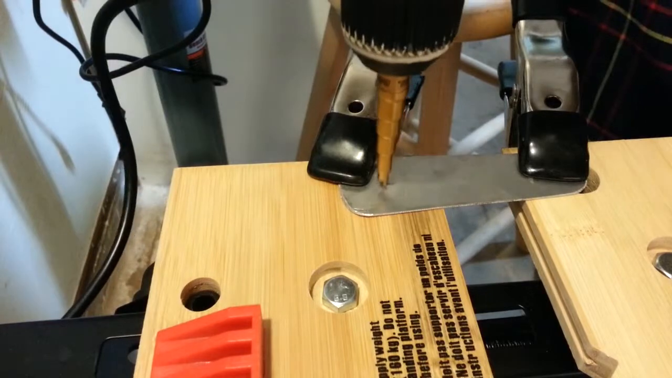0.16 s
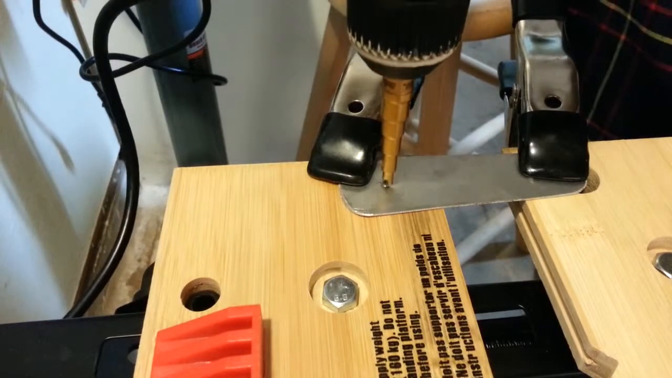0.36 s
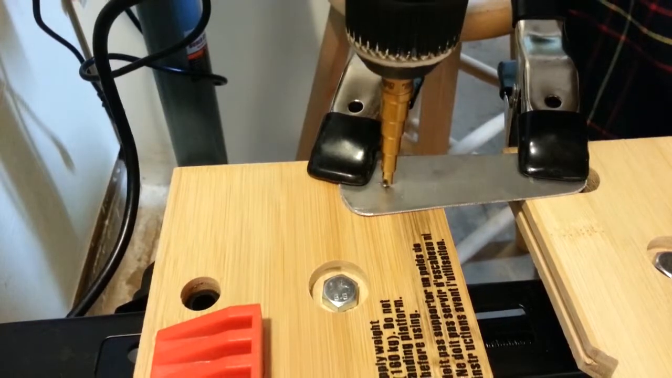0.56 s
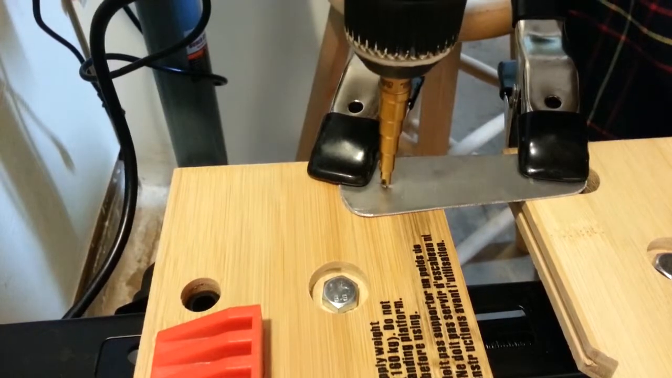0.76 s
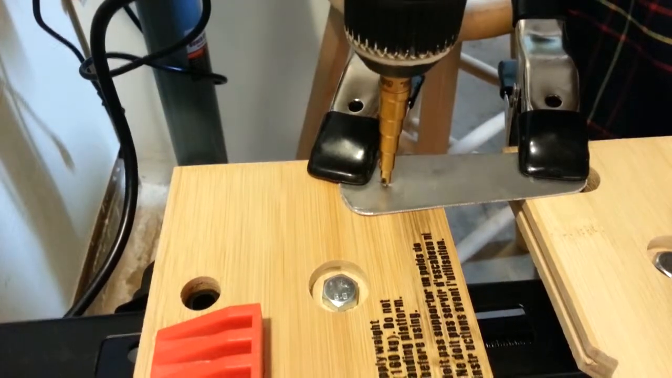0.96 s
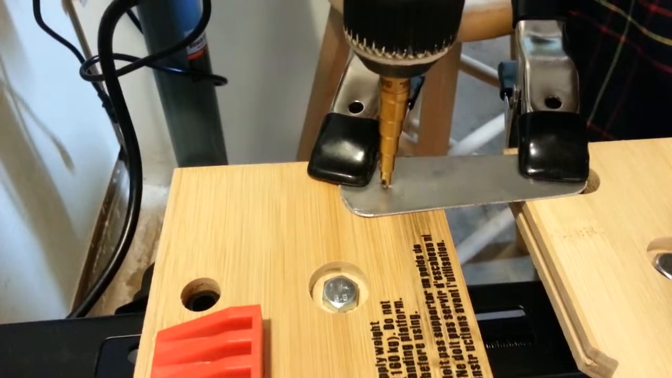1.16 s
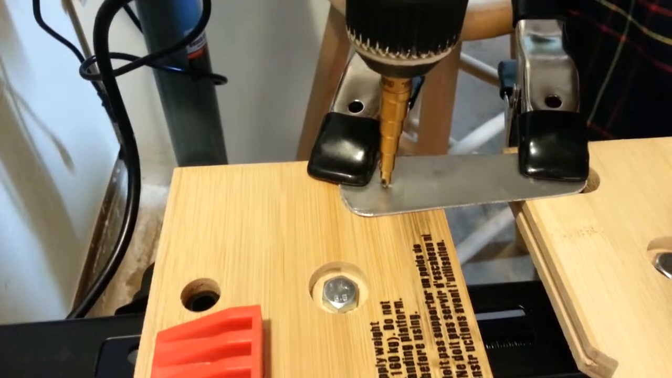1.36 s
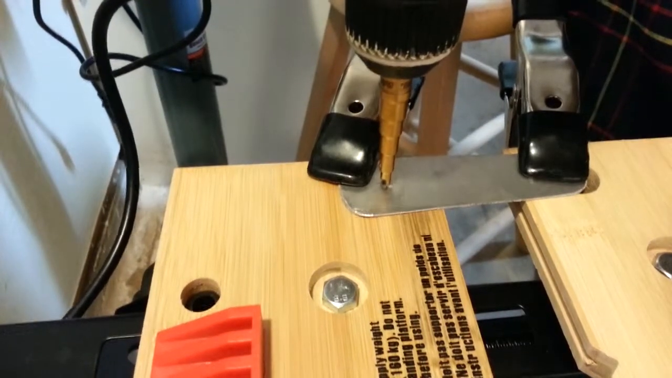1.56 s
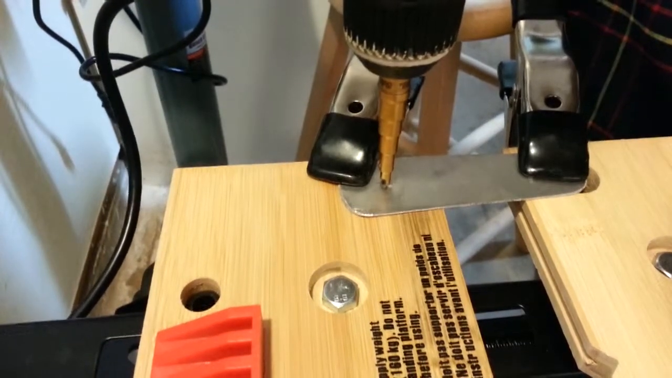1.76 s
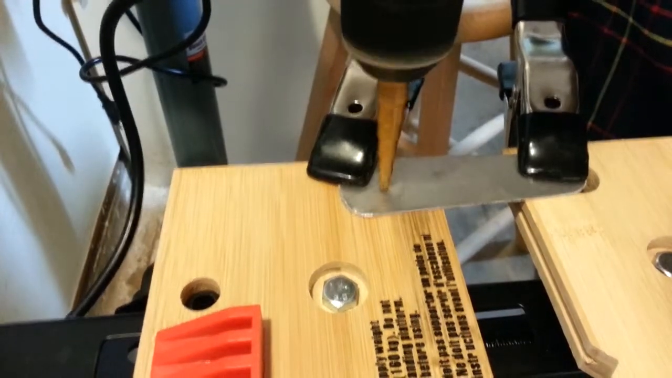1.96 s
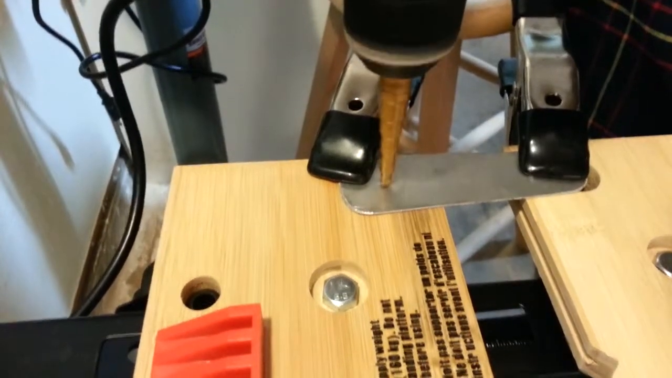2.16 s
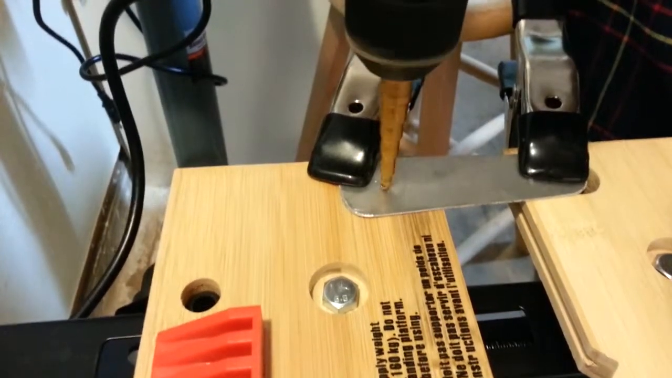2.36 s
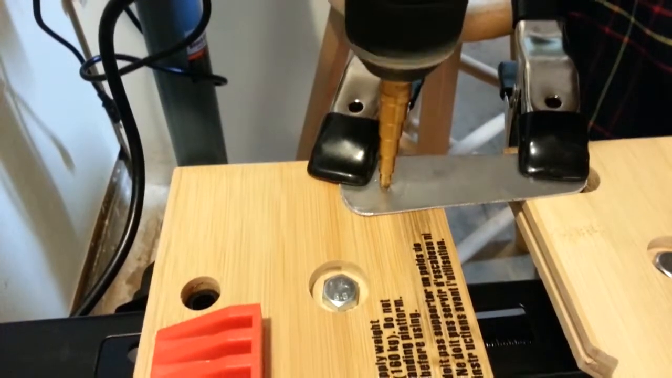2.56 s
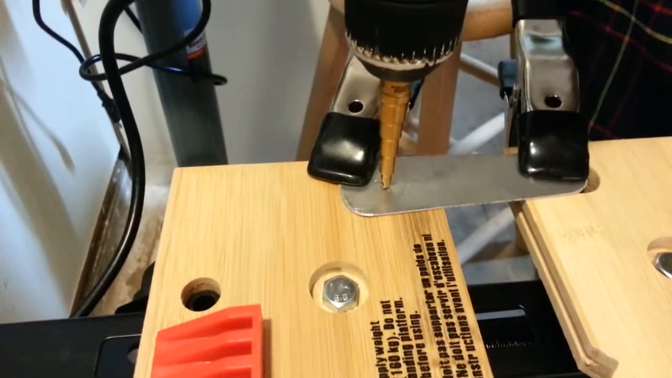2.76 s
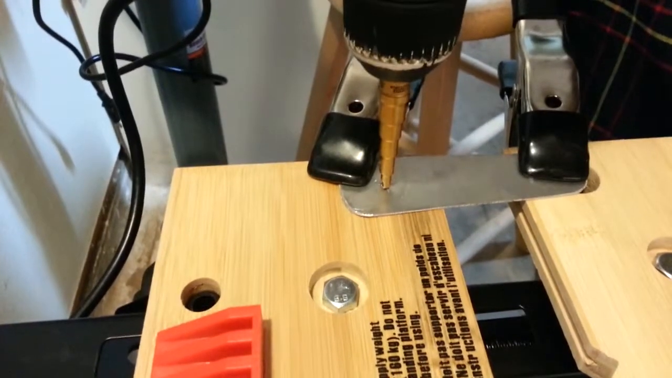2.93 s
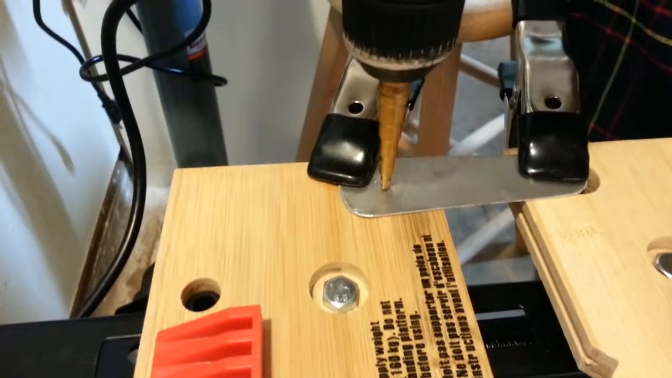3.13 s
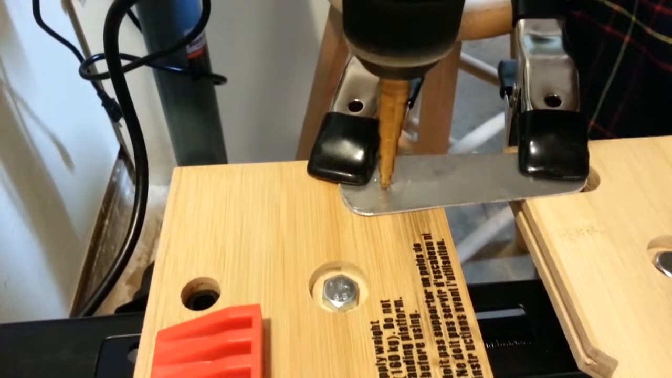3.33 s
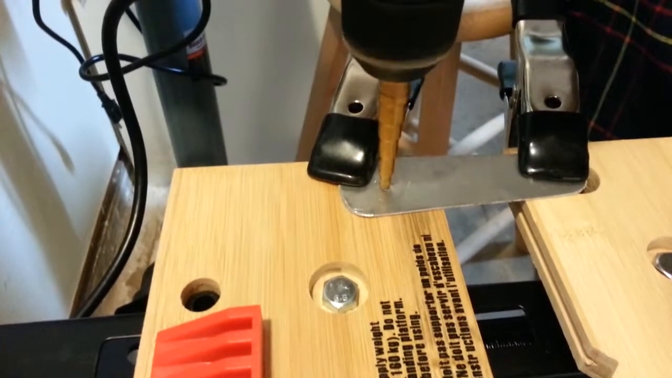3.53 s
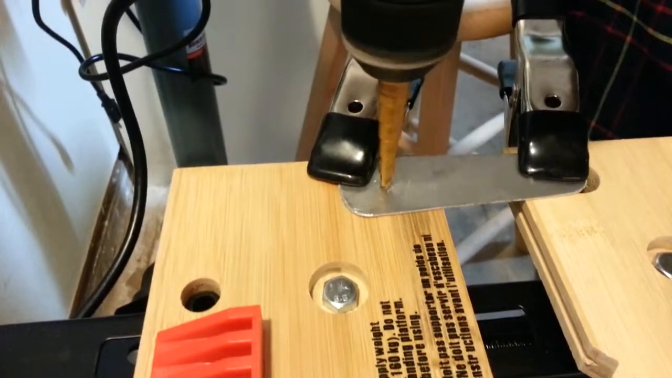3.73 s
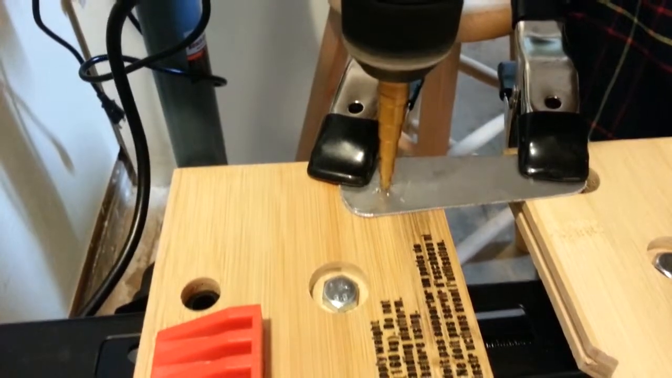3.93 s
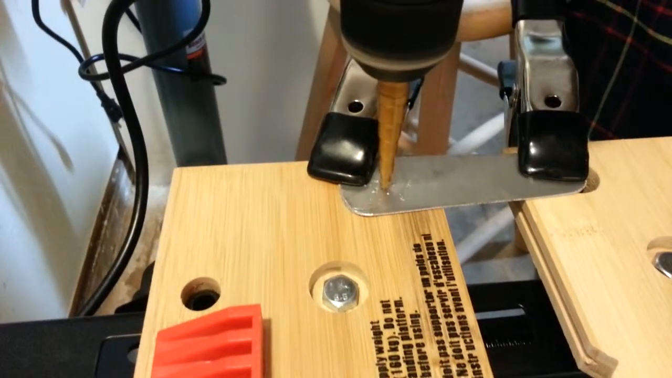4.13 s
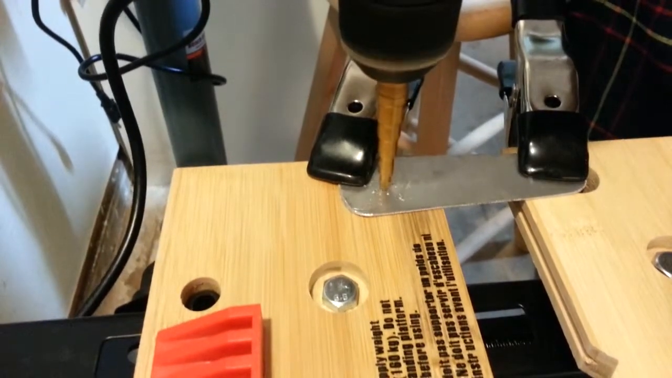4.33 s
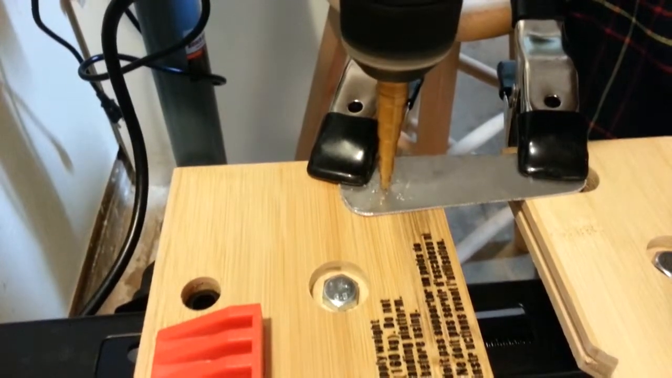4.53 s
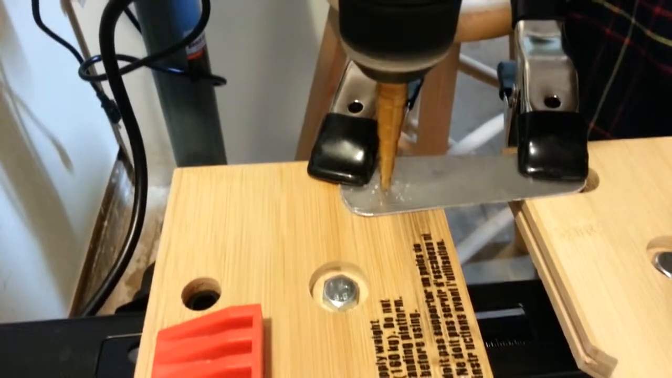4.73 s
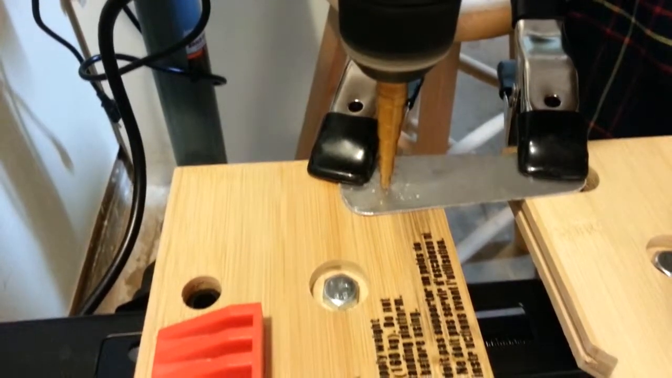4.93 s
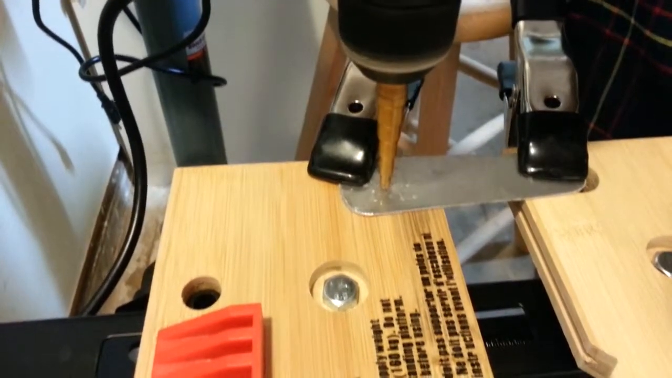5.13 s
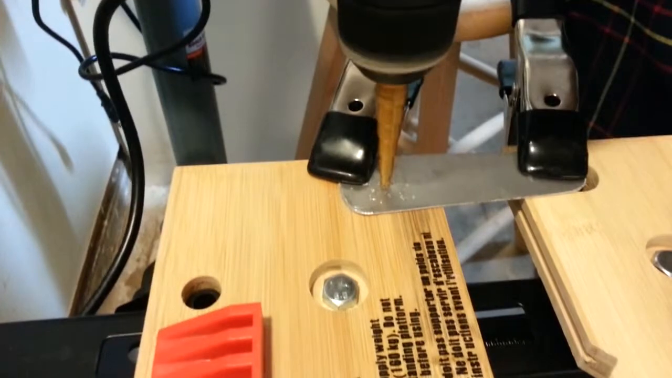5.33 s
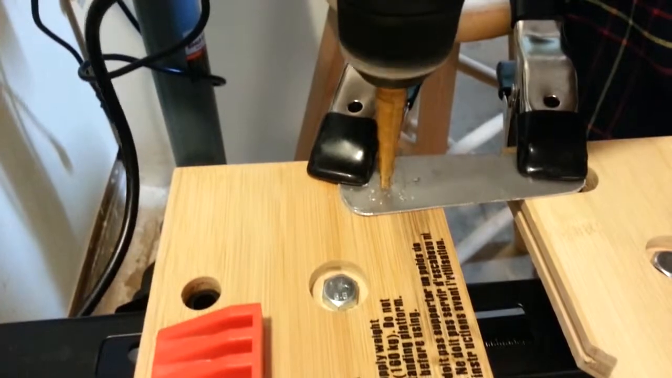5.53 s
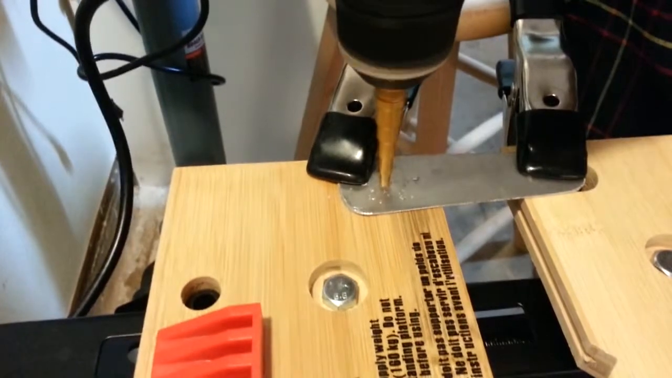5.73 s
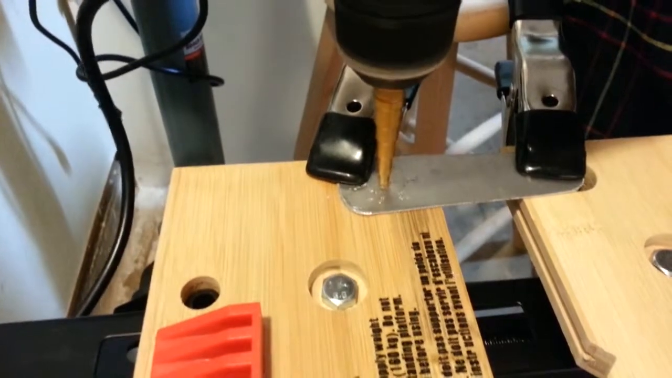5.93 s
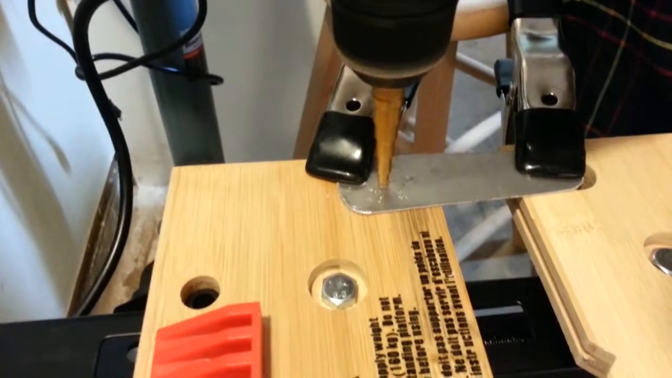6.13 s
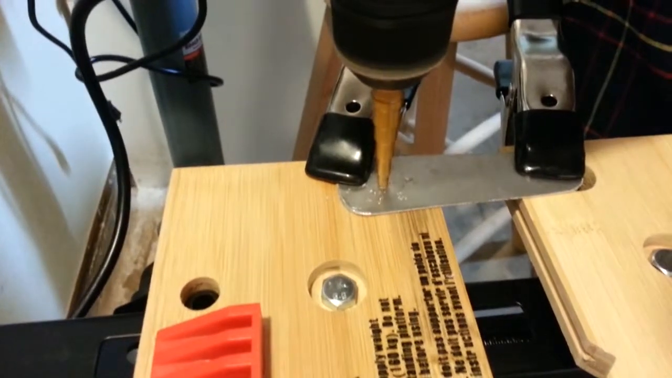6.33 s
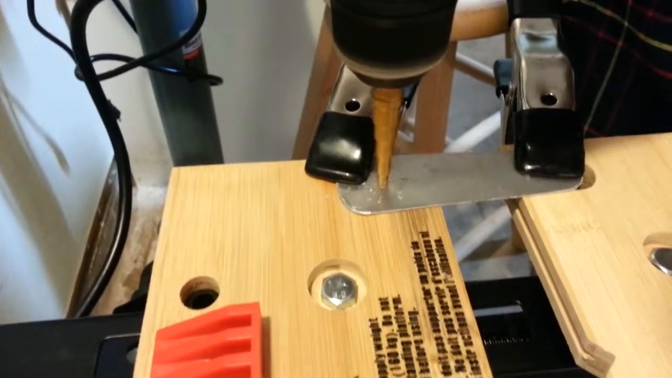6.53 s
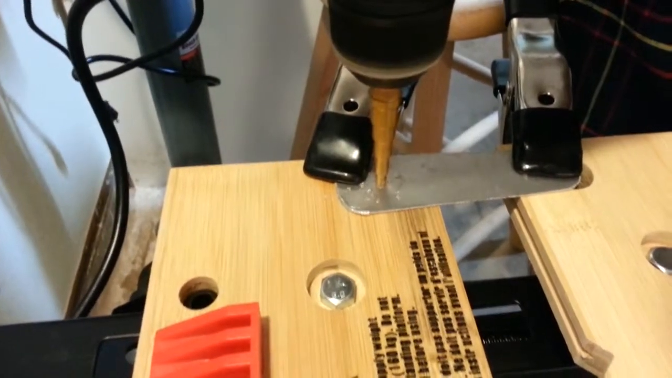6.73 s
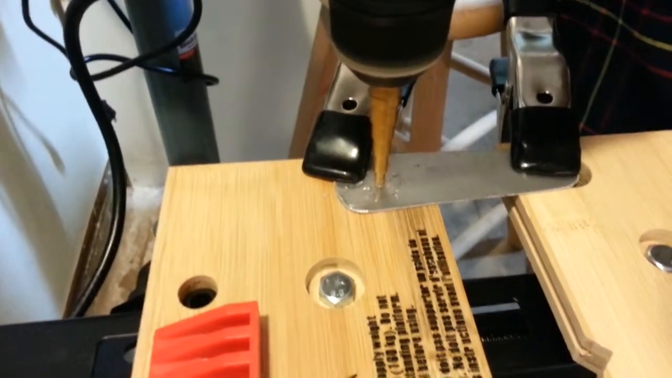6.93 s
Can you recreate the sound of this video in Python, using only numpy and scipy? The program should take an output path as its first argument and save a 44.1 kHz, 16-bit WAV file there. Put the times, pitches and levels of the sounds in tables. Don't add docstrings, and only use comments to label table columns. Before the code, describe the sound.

Close to a small stereo camera, a nearly silent bench is disturbed by light scraping, cloth and trigger clicks. Then an electric drill is pulsed in very brief pulls: each surges to a piercing, buzzing whine and sags into a rattling, falling spin. Early pulls stand apart; later ones overlap the previous run-down and reach higher. Fan air thumps the right microphone, with a short room reflection.

```python
import sys
import numpy as np
from scipy import signal
from scipy.fft import rfft, irfft, next_fast_len
from scipy.io import wavfile
from scipy.ndimage import uniform_filter1d, map_coordinates

SR = 44100
rng = np.random.default_rng(int(sys.argv[2]) if len(sys.argv) > 2 else 0)


def magnitude_from_level(level_db):
    exponent = np.asarray(level_db, float) / 20
    return 10 ** exponent


def to_wav(sig):
    pcm = np.clip(np.atleast_2d(sig), -1, 1) * 32767
    pcm = np.round(pcm).astype(np.int16)
    wavfile.write(sys.argv[1], SR, pcm.T)


N = 312669

BARS = 12
KICK_HZ = 651.3
KNEE_HZ, CLIMB_S = 2602, .2
FRICTION_HZ, COAST_S = 5040, 1.9
# (on [s], off [s], bar rate reached [Hz], surge [Hz/s], bite of the bit [dB])
TRIGGER_PULLS = [
    (1.955, 2.054, 2612, 20940, -0.03),
    (3.225, 3.309, 2672, 24280, 0),
    (3.838, 3.963, 3510, 30950, -0.5),
    (4.408, 4.549, 3498, 19000, -0.5),
    (4.919, 5.081, 3784, 22100, -0.5),
    (5.832, 5.965, 3650, 28700, 0.5),
    (6.36, 6.671, 4330, 21970, -2),
    (6.906, 7.088, 4270, 22000, -2.5),
]


def speed():
    bar_hz, on, bite_db = np.zeros((3, N))
    t = np.arange(N) / SR
    for start, stop, top_hz, surge, db in TRIGGER_PULLS:
        a = round(start * SR)
        b = min(round(stop * SR), N - 1)
        low_hz = bar_hz[a] or KICK_HZ
        knee_hz = max(low_hz, KNEE_HZ)
        knee = min(start + (knee_hz - low_hz) / surge, stop - 1e-3)
        progress = np.expm1((knee - t[a:b]) / CLIMB_S) / np.expm1((knee - stop) / CLIMB_S)
        climb = knee_hz + (top_hz - knee_hz) * progress
        bar_hz[a:b] = np.where(t[a:b] < knee, low_hz + surge * (t[a:b] - start), climb)
        coast = (top_hz + FRICTION_HZ) * np.exp((stop - t[b:]) / COAST_S) - FRICTION_HZ
        bar_hz[b:] = np.maximum(coast, 0)
        on[a:b] = 1
        bite_db[a:] = db
    return bar_hz, uniform_filter1d(on, size=200), bite_db


MAINS_HZ = 119.912
JITTER = .0006


def motor():
    bar_hz, powered, _ = speed()
    shaft_hz = bar_hz / BARS * (1 + JITTER * wobble(60))
    throb = powered * np.cos(2 * np.pi * MAINS_HZ * np.arange(N) / SR)
    turn = 2 * np.pi * np.cumsum(shaft_hz) / SR
    return shaft_hz, turn, powered, throb


RUNDOWN_S = 0.019
ATTACK_S = 0.0081
RATTLE_DB, RATTLE_DB_PER_DECADE, POWER_DB, STALL_HZ = -37, 22, 2, 313
HISS_DB, HISS_DB_PER_DECADE, HISS_POWER_DB, HISS_STALL_HZ = -2.5, -11.5, 0, 770
FAN_DB, FAN_DB_PER_DECADE, FAN_FULL_HZ, FAN_LAG_S = -33.5, 61.5, 2510, 0.03
WHINE_DB, WHINE_DB_PER_DECADE = 1.5, 5


def running():
    bar_hz, on, bite_db = speed()
    bar_hz = np.maximum(bar_hz, trailing(bar_hz, RUNDOWN_S))

    def decades(hz, ref_hz):
        return np.log10(hz / ref_hz + 1e-3)

    def stall_db(hz):
        return 20 * np.minimum(decades(bar_hz, hz), 0)

    opening_db = 40 * np.log10(trailing(1. * (bar_hz > 0), ATTACK_S / 2) + 1e-3)
    push_db = trailing(POWER_DB * on + bite_db, 0.004)
    rattle_db = RATTLE_DB + RATTLE_DB_PER_DECADE * decades(bar_hz, 2793)
    rattle_db = rattle_db + push_db + stall_db(STALL_HZ) + opening_db
    pace = decades(bar_hz + 300, 2000)
    hiss_db = HISS_DB + HISS_DB_PER_DECADE * pace + HISS_POWER_DB * on + stall_db(HISS_STALL_HZ).clip(-9)
    fan_pace = np.minimum(decades(trailing(bar_hz, FAN_LAG_S), FAN_FULL_HZ), 0)
    fan_db = FAN_DB + FAN_DB_PER_DECADE * fan_pace
    whine_db = WHINE_DB + WHINE_DB_PER_DECADE * pace
    return rattle_db, hiss_db, fan_db, whine_db


OVERTONES_FLUTTER_DB = 2.2
STRONG_ORDERS = [11, 14, 17, 22, 23, 25, 28, 31, 32, 34, 35, 36, 37, 38, 46, 47, 48, 53, 57, 59, 60, 61, 70,
                 71, 72]
STRONG_ORDER_LEVELS = [-11.5, -12, -14, -3.5, 0.5, -7, -5, -10, -10, -8, -5, -3.5, -7, -9, 1.5, -4, -2.5, 1,
                       -9, 3, 0, -5, -1, 2, 4]


def comb(turn, orders):
    strong = dict(zip(STRONG_ORDERS, STRONG_ORDER_LEVELS))
    gains = magnitude_from_level([strong.get(order, -15) for order in orders])
    angle = np.linspace(0, 2 * np.pi, num=8193)
    start, other = rng.uniform(-np.pi, np.pi, (2, len(orders)))
    phases = [start, start + other * np.clip(orders / 45, 0, 1) ** 2]
    shapes = [gains @ np.sin(orders[:, None] * angle + phase[:, None]) for phase in phases]
    lines = np.array([np.interp(turn % (2 * np.pi), angle, shape) for shape in shapes])
    flutter_db = np.clip(orders[0] / 30, .5, 1) * OVERTONES_FLUTTER_DB * wobble(30)
    return magnitude_from_level(flutter_db) * lines


BAR_DB, UPPER_DB, FLUTTER_DB = -5.5, -12, 1.2
# (frequency [Hz], level [dB])
HOUSING = [(700, -42), (1700, -33), (2350, -9), (2750, -5.5), (3050, 0.5), (3400, -2.5), (4000, 0.5),
           (4900, -0.5), (5550, -3.5), (6000, -21.5), (7000, -9.5), (10000, -12.5), (14000, -27)]


def whine(shaft_hz, turn, powered, throb):
    rattle_db, _, _, whine_db = running()
    orders = np.setdiff1d(np.arange(5, 86), [BARS, BARS + 1, 2 * BARS])
    groups = np.array_split(orders, 6)
    lines = sum(comb(turn, group) * np.clip(5 - group[0] * shaft_hz / 3500, 0, 1) for group in groups)
    torque = powered * np.clip(3.9 - shaft_hz / 88, 0, 1)
    octave_torque = powered * np.clip(2.6 - shaft_hz / 80, 0, 1)
    bar = magnitude_from_level(BAR_DB + 17.3 * torque + 0.98 * wobble(40)) * np.sin(BARS * turn)
    octave = magnitude_from_level(0.7 + 13.7 * octave_torque + FLUTTER_DB * wobble(40)) * np.sin(2 * BARS * turn)
    upper = magnitude_from_level(UPPER_DB + shaft_hz / 30 + 0.9 * wobble(37)) * np.sin((BARS + 1) * turn)
    lines = upper + (1 + 0.96 * throb) * (bar + octave) + magnitude_from_level(-4 * powered) * lines
    return filtered(magnitude_from_level(rattle_db + whine_db) * lines, lambda hz: magnitude_from_level(along(HOUSING, hz)))


GRIND_DB, GRIND_FULL_HZ = -55, 21
# (frequency [Hz], level [dB per Hz])
RATTLE = [(290, -18), (500, -3.5), (683, -4), (973, 1.5), (1210, -4), (1760, 2), (2060, -4), (2730, -3.5),
          (3070, -7.5), (3310, -6), (3560, -0.5), (4280, -11), (4710, -3.5), (6030, -28), (6500, -37.5),
          (8450, -50), (14300, -120)]
# (frequency [Hz], level [dB per Hz])
HISS = [(3240, -49.5), (5500, 2.5), (6100, -5.5), (6870, -1.5), (8000, -7), (13400, -13.5), (14700, -19)]
# (frequency [Hz], level [dB per Hz])
GRIND = [(1500, -32), (2500, -6), (3300, 3), (4500, -6), (7000, -27)]
# (frequency [Hz], left-right likeness [-1 to 1])
DRILL_ALIKE = [(500, 0.85), (1400, 0.58), (3000, 0.11), (5000, 0.14), (8000, 0.067), (14000, 0.12)]


def rush(turn, throb):
    rattle_db, hiss_db = running()[:2]
    rattle_beat_db = 0.44 * np.sin(turn) + 0.24 * throb + 0.6 * wobble(70)
    rattle = unit(magnitude_from_level(rattle_beat_db) * pair(RATTLE, DRILL_ALIKE))
    hiss_beat_db = 1.5 * np.sin(turn + 1) + 0.87 * throb + 0.66 * wobble(90)
    hiss = unit(magnitude_from_level(hiss_beat_db) * pair(HISS, DRILL_ALIKE))
    shaft_hz = np.gradient(turn) * SR / (2 * np.pi)
    spinning = trailing(np.clip(shaft_hz / GRIND_FULL_HZ, 0, 1), RUNDOWN_S)
    grind = magnitude_from_level(GRIND_DB) * spinning * pair(GRIND, DRILL_ALIKE)
    return grind + magnitude_from_level(rattle_db + 6.0) * rattle + magnitude_from_level(rattle_db + hiss_db + 3.5) * hiss


PUFF_S = 0.0096
# (frequency [Hz], level [dB per Hz])
DRAUGHT = [(15, -61), (25, -10), (205, 6.5), (405, 2.5), (454, 4), (681, -5), (972, 3), (1200, -41),
           (1560, -46), (2640, -120)]
# (time [s], peak level [dB], frequency [Hz])
PUFFS = [(2.102, -16.5, 440), (2.143, -20, 447), (2.178, -18, 334), (2.282, -20, 335), (2.344, -24, 330),
         (3.367, -23, 334.3), (3.404, -20, 375), (3.505, -21, 214), (3.975, -19.5, 646),
         (4.028, -13.5, 513), (4.072, -20, 517), (4.206, -20, 250), (4.526, -15, 285), (4.598, -17.5, 478),
         (4.646, -20.5, 454), (4.751, -16, 288), (5.001, -20.5, 312), (5.113, -14, 432.5),
         (5.16, -17.5, 222.8), (5.226, -19.5, 346), (5.289, -15.5, 611), (5.479, -18.5, 381.6),
         (5.966, -22, 233.5), (6.014, -18, 458), (6.444, -25.5, 243), (6.537, -19, 627),
         (6.582, -18.5, 363), (6.689, -18.5, 301), (6.94, -18.5, 538), (7.027, -16, 342)]


def draught():
    lumps = magnitude_from_level(4 * np.array([wobble(70), wobble(70)]))
    air = magnitude_from_level(running()[2] + [[-14], [3]]) * unit(lumps * noise(DRAUGHT, channels=2))
    t = np.arange(SR // 10) / SR
    push, swirl = np.zeros((2, N + len(t)))
    for (s, db, hz), phase in zip(PUFFS, rng.random(len(PUFFS))):
        u = t * hz / 0.66
        v = t / PUFF_S
        i = round(s * SR)
        push[i:][:len(t)] += magnitude_from_level(db + 0.5) * u * np.exp(1 - u) * np.sin(2 * np.pi * (hz * t + phase))
        swirl[i:][:len(t)] += magnitude_from_level(db - 5.0) * v * np.exp(1 - v * v)
    thumps = filtered(push[:N], lambda hz: 1j * hz / (90 + 1j * hz))
    swirls = swirl[:N] * noise([(60, -12), (200, 1.5), (500, 1.5), (1000, -7.5), (1600, -51)])
    return air + magnitude_from_level([[-24], [0]]) * (thumps + swirls)


# (time [s], peak level [dB], ring [Hz], treble over peak [dB], left-right [dB])
CLICKS = [(0.344, -62, 958, -25, 2), (0.468, -48, 2100, -12.5, 4), (0.595, -56.5, 1220, -14, 2),
          (1.224, -64, 1020, -9, -1.5), (1.408, -53, 1030, -36, 2.0), (1.651, -62, 2010, -13, 2.0),
          (1.806, -47, 1420, -18, 7), (1.813, -36.5, 2110, -19.5, -3), (3.097, -43.5, 2270, -15.5, 1.5),
          (3.102, -40, 1650, -20, -2), (3.199, -54, 2020, -17, 2), (3.205, -64.5, 925, 2, 0.5),
          (3.222, -49, 3820, -25, 2.5)]


def clicks():
    t = np.arange(SR // 20) / SR
    out = np.zeros((2, N + len(t)))
    for s, db, hz, treble_db, pan_db in CLICKS:
        ring = magnitude_from_level(-60 * t / 0.014) * np.sin(2 * np.pi * hz * t)
        knock = 0.39 * magnitude_from_level(-60 * t / .025) * np.sin(2 * np.pi * 540 * t)
        dulled = np.convolve(rng.standard_normal(len(t)), np.ones(5) / 3, "same")
        scatter = magnitude_from_level(treble_db + 11 - 60 * t / .015) * dulled
        crack = magnitude_from_level(treble_db - 18 - 60 * t / .008) * np.diff(rng.standard_normal(len(t) + 1))
        gain = magnitude_from_level(db + 1.3 + pan_db * np.array([[.5], [-.5]]))
        i = round(s * SR)
        out[:, i:i + len(t)] += gain * (ring + knock + scatter + crack)
    return out[:, :N]


# (frequency [Hz], t60 [s])
WALLS = [(300, 0.19), (2000, 0.17), (8000, 0.073), (14000, 0.043)]


def walls(x):
    hz, t, z = signal.stft(rng.standard_normal((2, SR // 2)), SR, nperseg=256)
    fade = magnitude_from_level(-60 * t / along(WALLS, hz)[:, None])
    tail = signal.istft(z * fade, SR, nperseg=256)[1]
    return signal.fftconvolve(x, tail / np.linalg.norm(tail[0]), axes=1)[:, :N]


AIR_DB = -76
DRONE_DB, DRONE_WAVERS_DB, DRONE_REST_DB = -72.5, 2.5, -85
DRONE_STOPS_S, DRONE_FADES_DB_PER_S = 0.91, 60
# (frequency [Hz], level [dB per Hz])
ROOM_AIR = [(15, -55), (25, -51), (49, -4.5), (206, -3), (241, -1.5), (262, -3.5), (390, -7), (434, -9.5),
            (538, -13.5), (648, -9), (846, -17.5), (941, -18), (14700, -29.5)]
# (frequency [Hz], left-right likeness [-1 to 1])
ROOM_AIR_ALIKE = [(60, 0.76), (130, 0.55), (290, 0.0055), (640, 0.064), (1410, 0.18), (3100, -0.19),
                  (6820, -0.43), (15000, 0.28)]
# (time [s], level [dB])
SCRAPES = [
    (0.0, -67),
    (.16, -67.5),
]
# (time [s], length [s], level [dB], fade over the length [dB])
RUSTLE = [
    (0.0, 0.53, -75, 12),
    (1.003, 0.32, -82, -8),
    (1.657, 0.1, -69, 25),
    (1.813, 0.17, -65, 3),
    (2.802, 0.294, -65, 6.5),
    (3.095, 0.17, -58, 22),
]


def shop():
    t = np.arange(N) / SR
    air = magnitude_from_level(AIR_DB + 8.0 + 0.46 * wobble(3.7)) * pair(ROOM_AIR, ROOM_AIR_ALIKE)

    drone_db = DRONE_DB - DRONE_FADES_DB_PER_S * np.maximum(t - DRONE_STOPS_S, 0)
    drone_db = np.maximum(drone_db, DRONE_REST_DB) + DRONE_WAVERS_DB * wobble(7.6)
    drone = magnitude_from_level(drone_db) * noise([(440, -31), (500, -4.5), (530, -4.5), (580, -13), (640, -48.0)])
    hum = magnitude_from_level(-75.5 + 3.2 * wobble(13)) * np.sin(2 * np.pi * 237 * t)

    stroke_db = np.max([db - 105 * np.abs(t - s) for s, db in SCRAPES], axis=0)
    scrape = magnitude_from_level(stroke_db) * noise([(600, -40), (670, 7.0), (760, -17), (1000, -7), (1300, -35),
                                     (1850, -11.0), (2100, -12.5), (2500, -49)])

    rustle_db = np.full(N, -120.0)
    for s, length, db, fade_db in RUSTLE:
        brushing = (t >= s) & (t < s + length)
        brush_db = np.where(brushing, db - fade_db * (t - s) / length, -120)
        rustle_db = np.maximum(rustle_db, brush_db)
    cloth = noise([(500, -1), (900, 6.0), (2000, -1.5), (4500, -10), (9000, -18)], channels=2)
    rustle = magnitude_from_level(rustle_db + 1.3 * wobble(23.0)) * cloth
    return air + drone + hum + scrape + rustle


def unit(x):
    return x / np.sqrt(np.mean(x ** 2) + 1e-20)


def along(points, hz):
    f, v = np.transpose(points)
    return np.interp(np.log(hz + 1), np.log(f + 1), v)


def wobble(rate):
    knots = rng.standard_normal(int(N * rate / SR) + 4)
    return map_coordinates(knots, [np.arange(N) * rate / SR])


def trailing(x, lag_s):
    keep = np.exp(-1 / (lag_s * SR))
    return signal.lfilter([1 - keep], [1, -keep], x)


def filtered(x, response):
    m = next_fast_len(N + SR // 2)
    return irfft(rfft(x, m) * response(np.fft.rfftfreq(m, 1 / SR)), m)[..., :N]


def noise(spectrum, channels=1):
    white = rng.standard_normal((channels, N))
    return unit(filtered(white, lambda hz: magnitude_from_level(along(spectrum, hz))))


def pair(spectrum, alike):
    def mid_side(hz):
        angle = np.arccos(np.clip(along(alike, hz), -1, 1)) / 2
        return np.array([np.cos(angle), np.sin(angle)])

    mid, side = filtered(noise(spectrum, channels=2), mid_side)
    return np.array([mid + side, mid - side])


# (frequency [Hz], left-right [dB])
TILT = [(200, 2.5), (1300, 0.5), (4400, 1), (8000, 0), (14000, 11)]


def scene():
    side = np.array([[.5], [-.5]])

    def ports(hz):
        return magnitude_from_level(side * along(TILT, hz)) * np.exp(2j * np.pi * hz * side * 5e-5)

    shaft_hz, turn, powered, throb = motor()
    near = filtered(whine(shaft_hz, turn, powered, throb), ports) + clicks()
    return near + magnitude_from_level(-8.5) * walls(near) + filtered(rush(turn, throb), ports) + draught() + shop()


def low_pass(x):
    return signal.sosfilt(signal.butter(12, 15650, fs=SR, output="sos"), x)


def record(dry):
    def microphones(hz):
        return (1j * hz / (42 + 1j * hz)) ** 2 * magnitude_from_level(np.interp(hz, [14500, 14800], [0, -45]))

    soft = dry / (1 + np.abs(dry / .28) ** 4) ** (1 / 4)
    heard = filtered(soft, microphones)
    return low_pass(heard)


dry = scene()
out = record(dry)
to_wav(out)
```